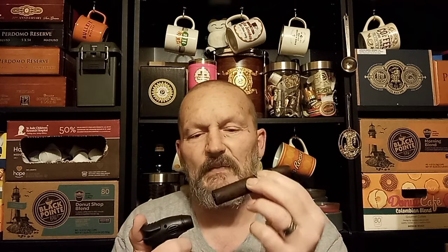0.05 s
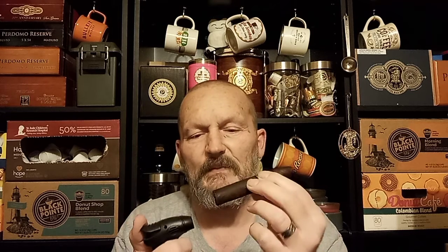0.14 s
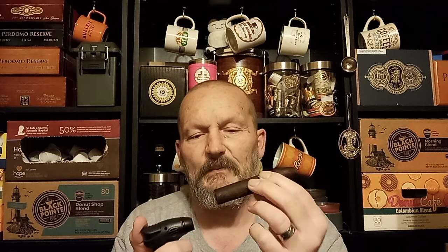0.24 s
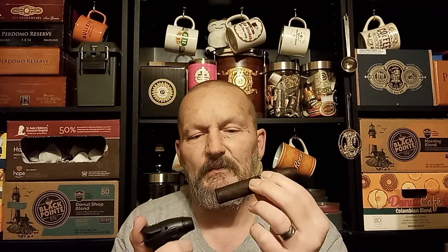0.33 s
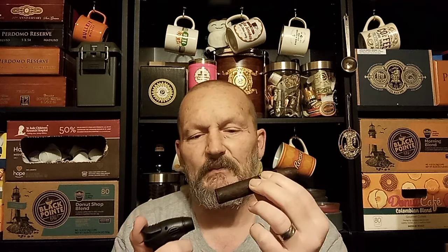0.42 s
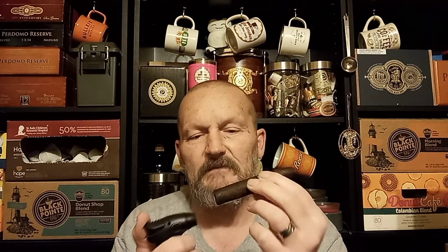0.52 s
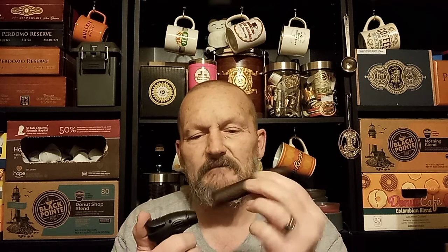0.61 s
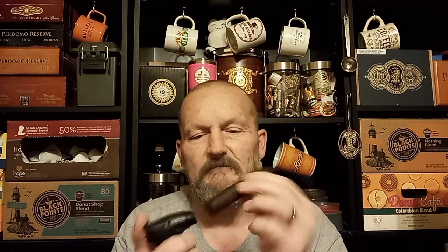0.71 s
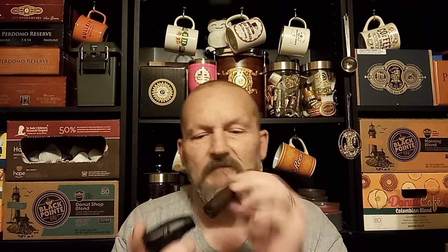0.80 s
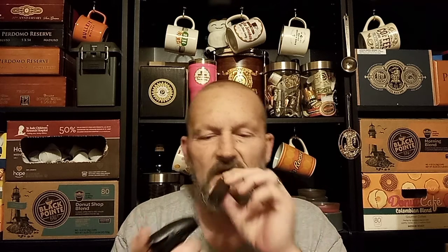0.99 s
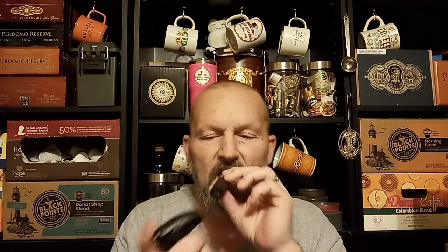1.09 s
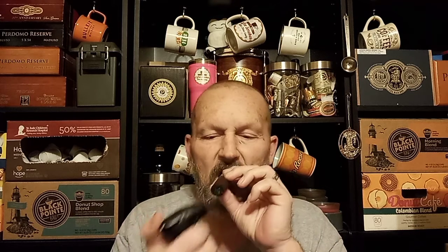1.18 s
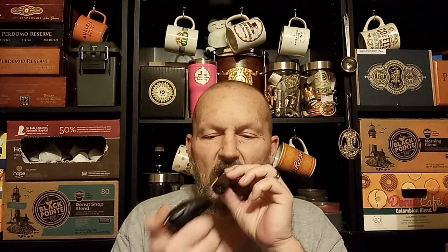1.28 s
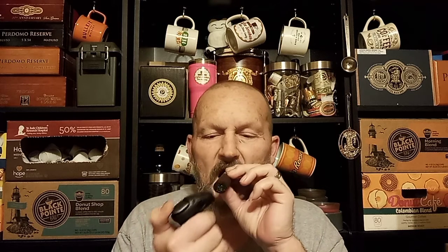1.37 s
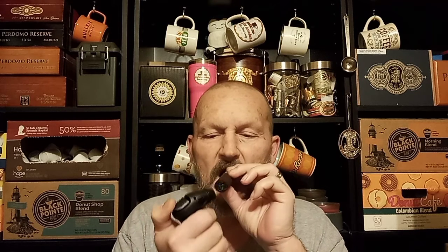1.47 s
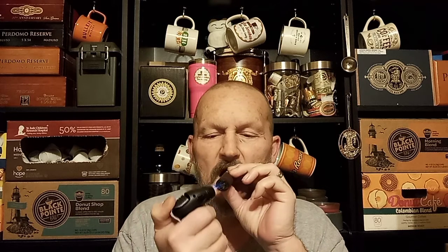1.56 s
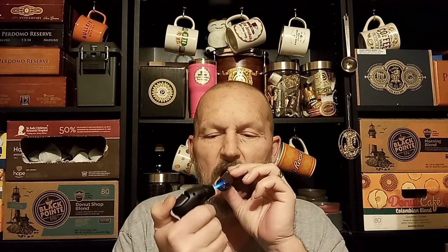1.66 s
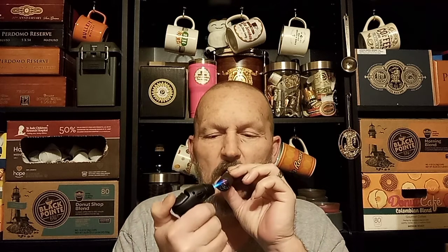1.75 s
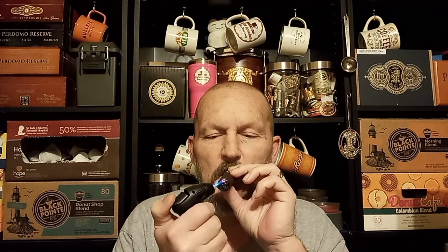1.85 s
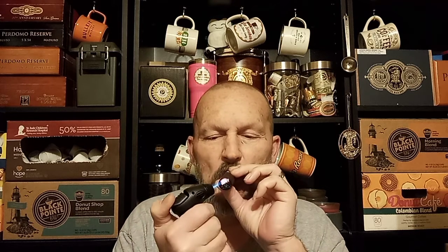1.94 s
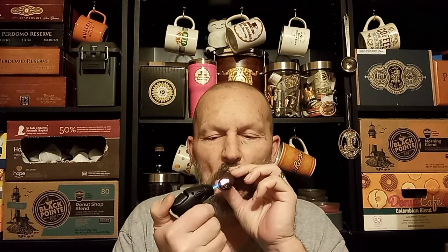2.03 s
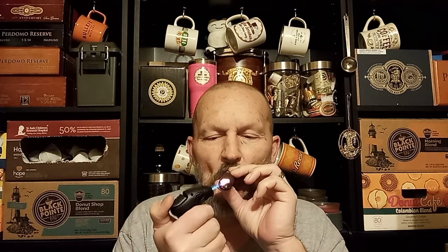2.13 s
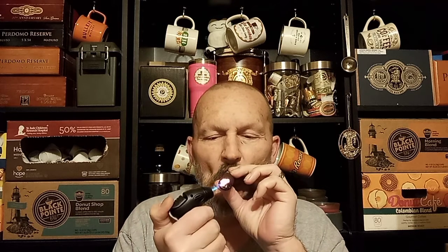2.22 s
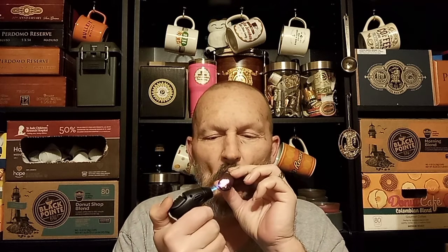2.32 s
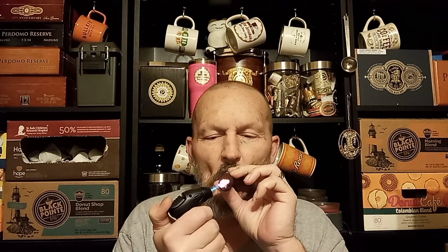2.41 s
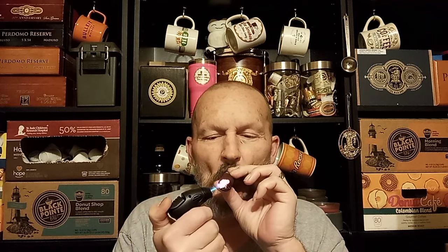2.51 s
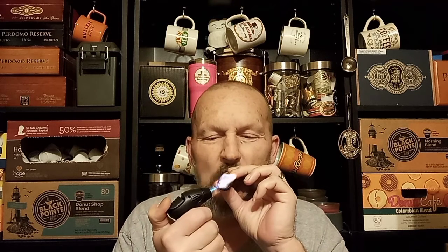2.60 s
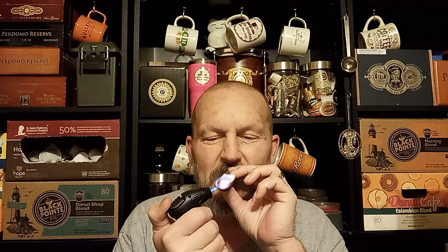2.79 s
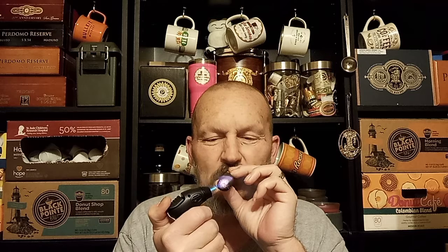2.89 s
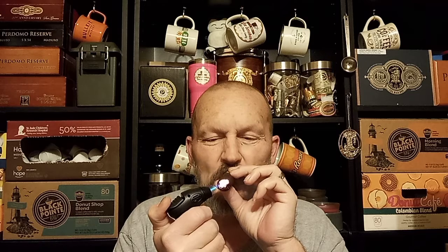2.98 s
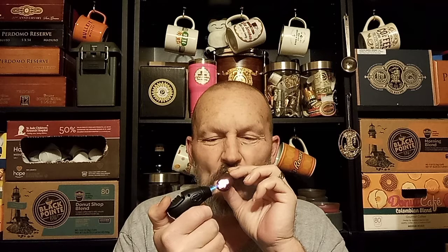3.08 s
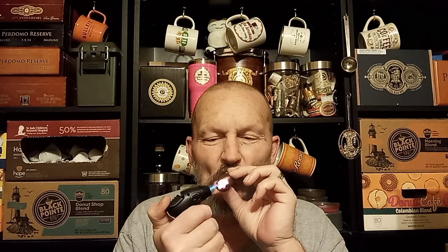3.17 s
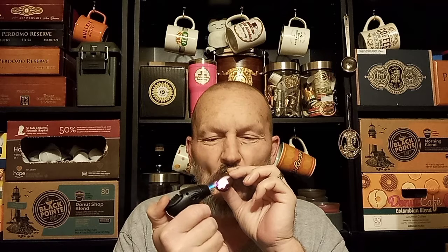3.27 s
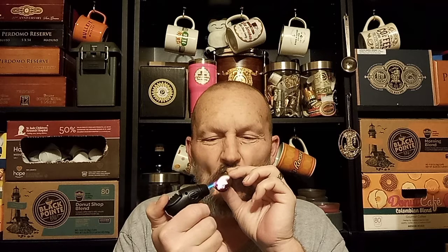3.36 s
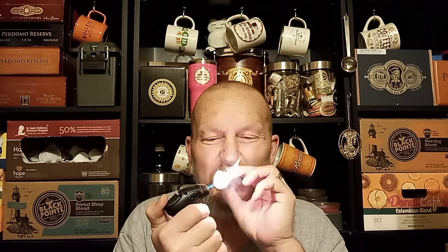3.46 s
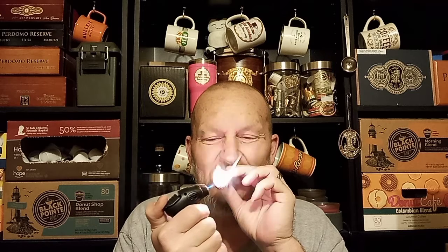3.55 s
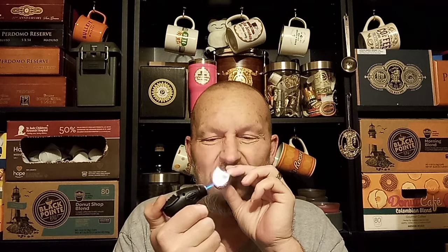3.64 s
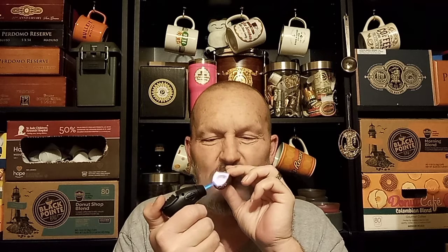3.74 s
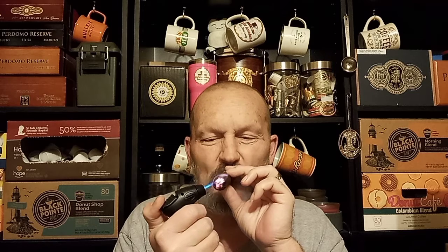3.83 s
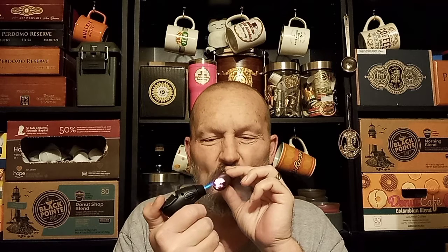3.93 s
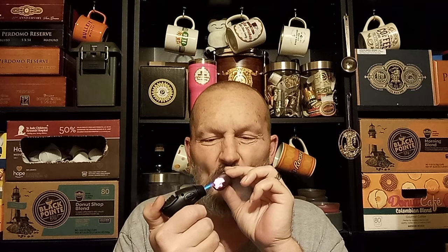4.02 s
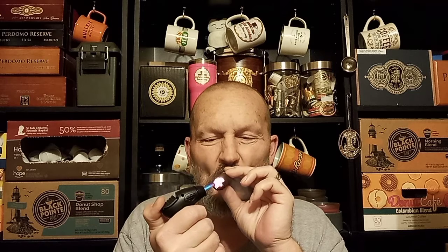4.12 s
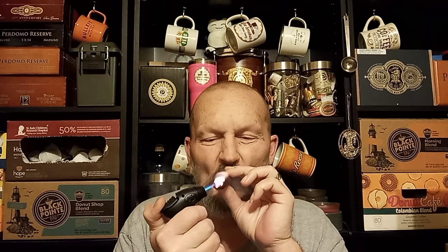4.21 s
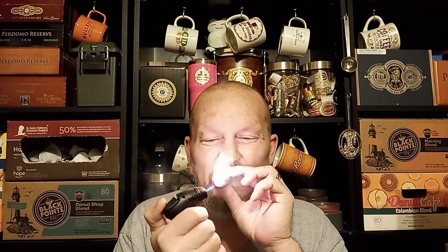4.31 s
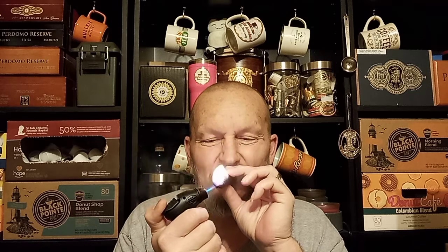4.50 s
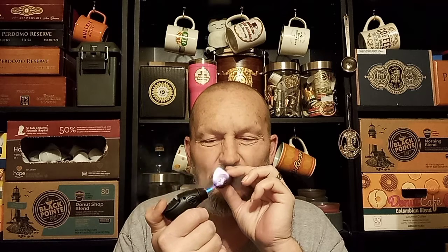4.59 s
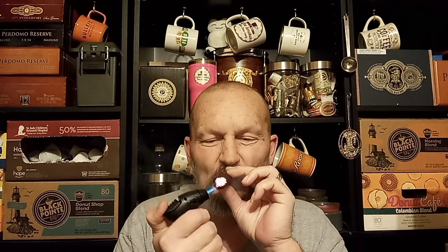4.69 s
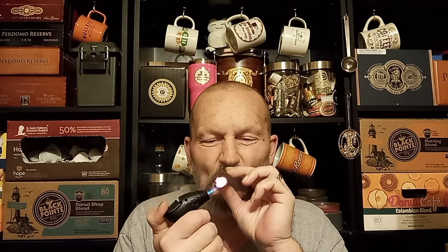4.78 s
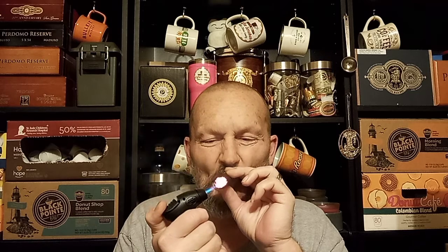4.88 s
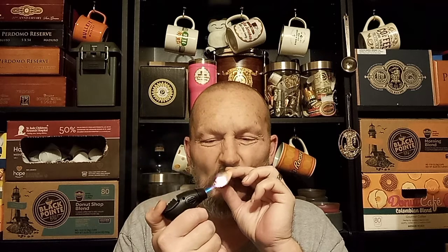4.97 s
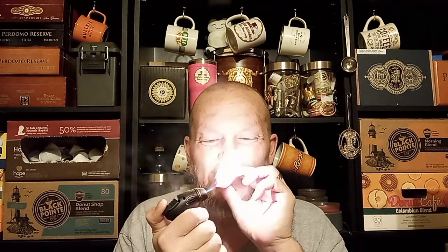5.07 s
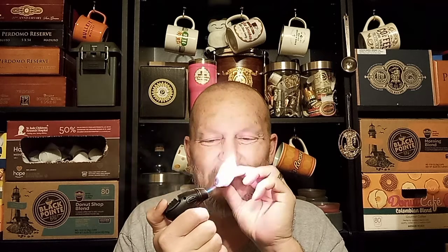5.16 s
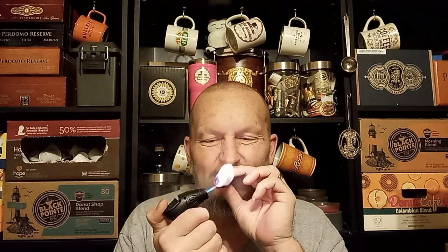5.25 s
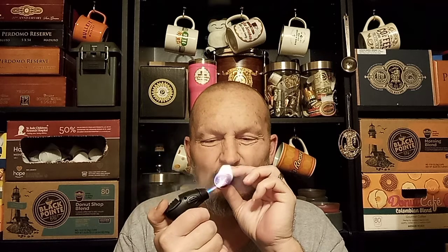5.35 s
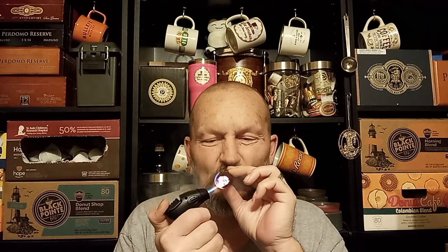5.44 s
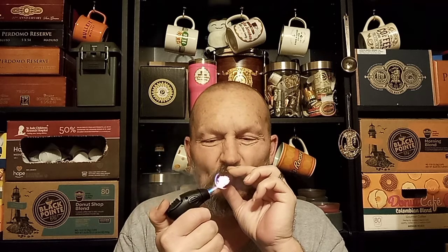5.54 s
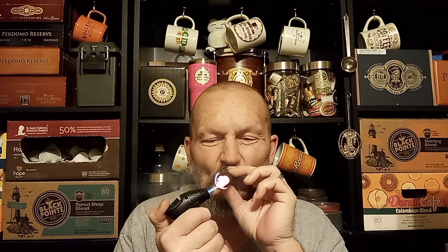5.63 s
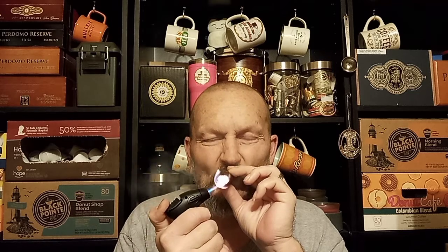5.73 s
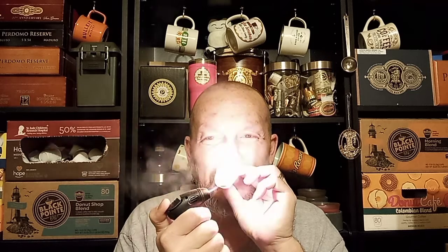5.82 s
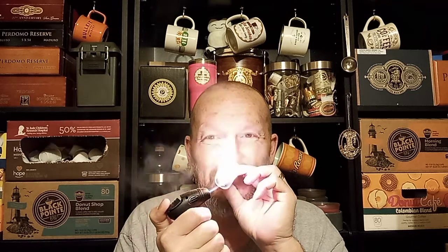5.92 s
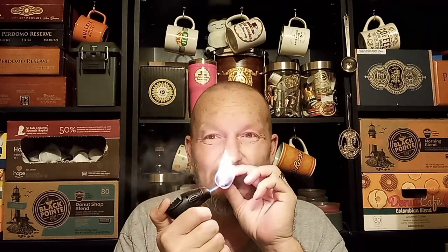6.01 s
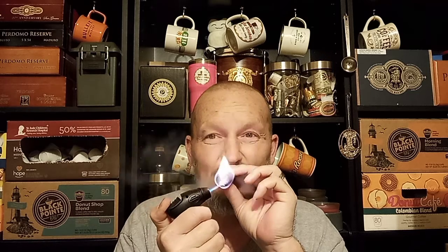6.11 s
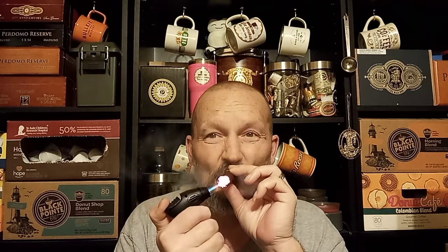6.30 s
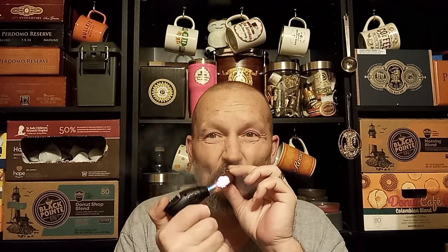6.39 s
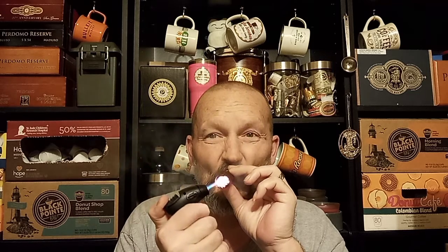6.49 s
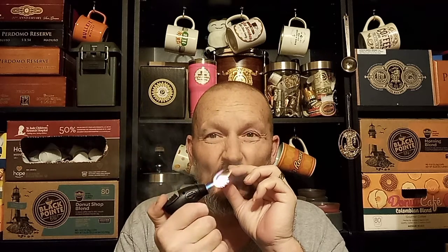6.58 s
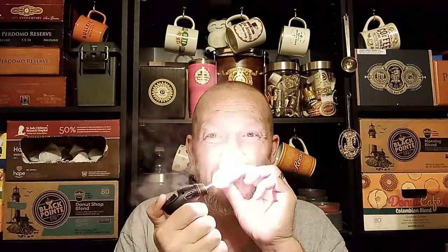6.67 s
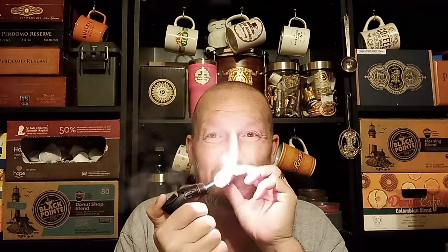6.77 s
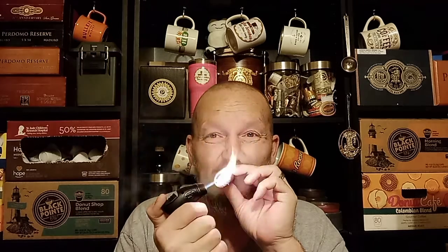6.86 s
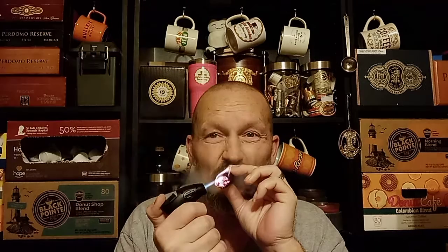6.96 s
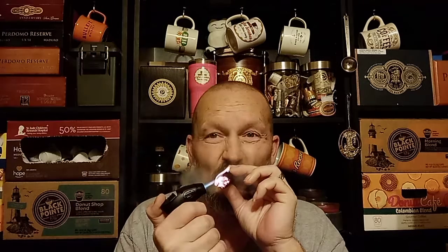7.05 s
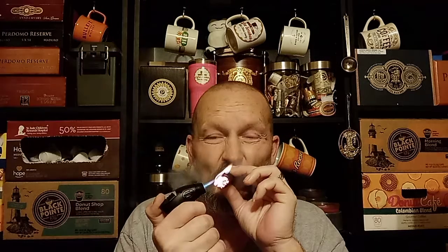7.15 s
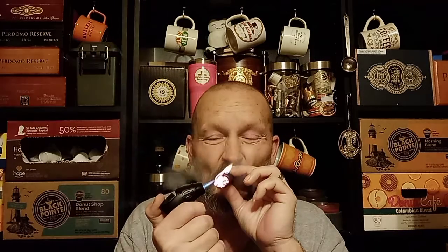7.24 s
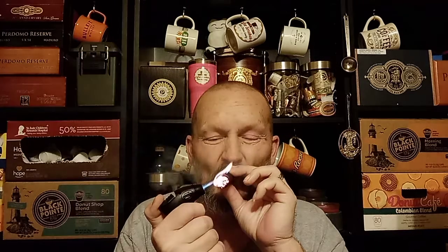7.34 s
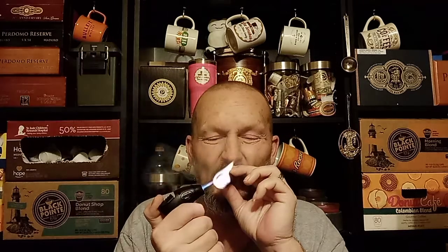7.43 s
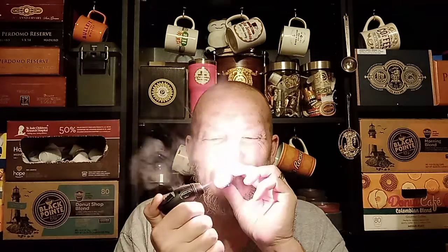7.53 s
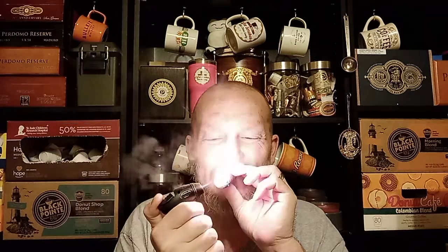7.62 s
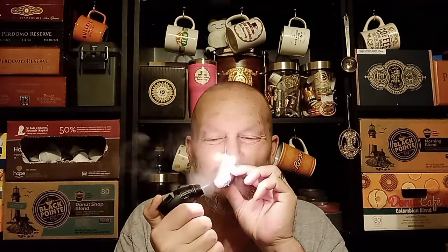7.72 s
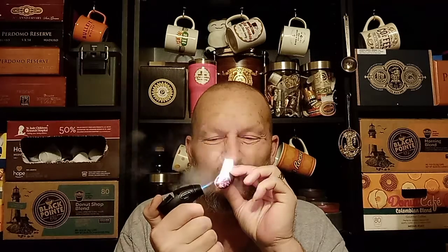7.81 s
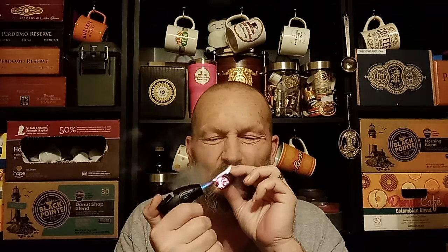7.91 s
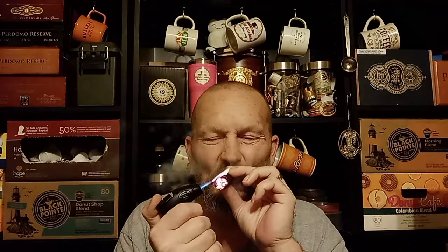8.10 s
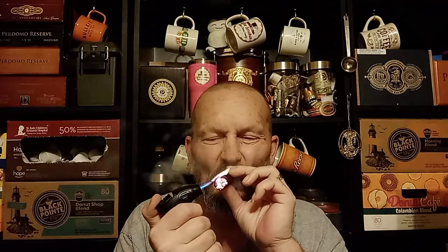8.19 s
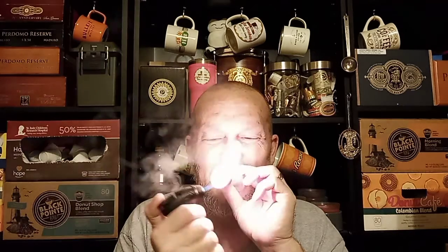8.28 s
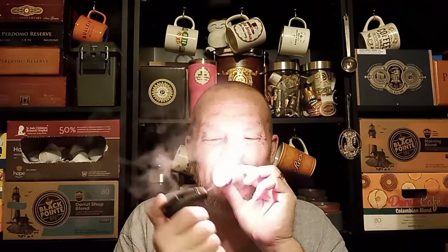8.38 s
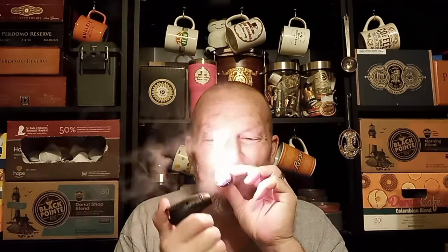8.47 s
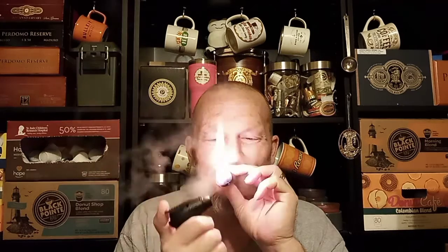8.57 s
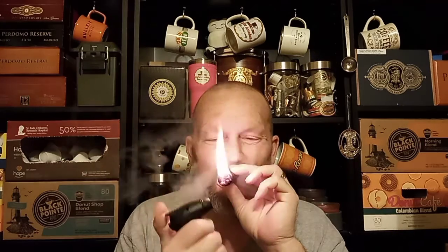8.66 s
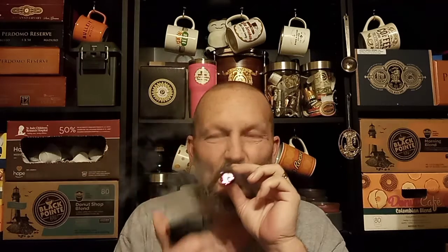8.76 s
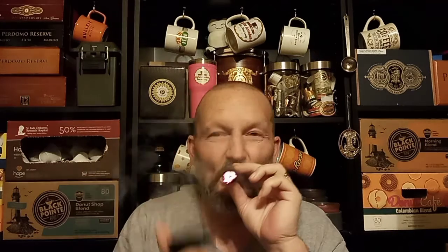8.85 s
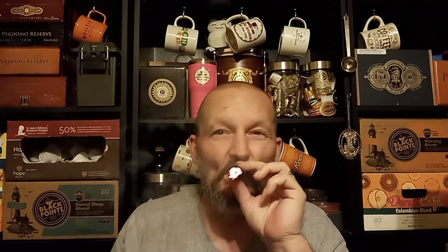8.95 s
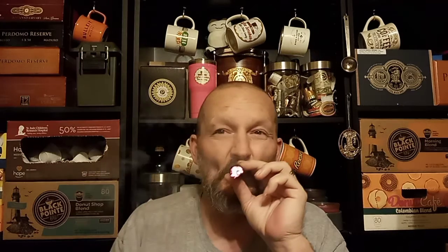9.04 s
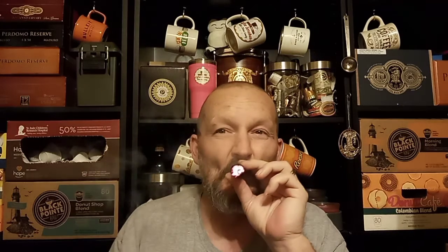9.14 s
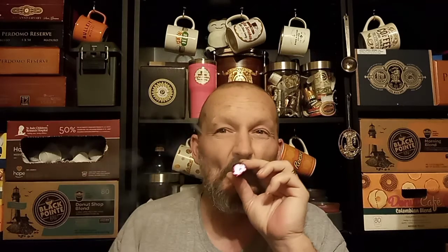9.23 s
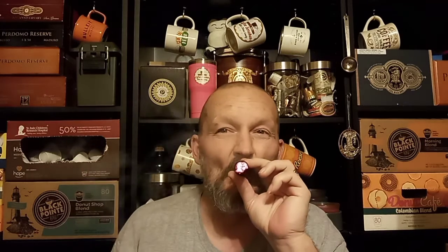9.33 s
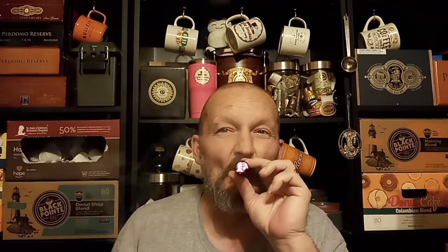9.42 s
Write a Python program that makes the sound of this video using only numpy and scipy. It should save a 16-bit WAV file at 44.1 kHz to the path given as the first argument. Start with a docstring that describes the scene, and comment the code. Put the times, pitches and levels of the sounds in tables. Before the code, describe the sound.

A quiet small room, heard by a close single microphone: a low, airy fan hum and fine, irregular metallic ticks from a tiny motor, about 25 possible beats per second with gaps, lasting almost to the end. At 0.1 s there is a handling knock with a brief rustle. Around 1.2 s gas starts hissing faintly, and at 1.46 s a very sharp igniter snap rings metal and briefly ducks everything. A torch jet follows, bright hiss over softer turbulent roar, growing by 2.2 s with a brief airy whistle, easing near 3.2 s, fuller from 3.5 to 5 s, weaker around 5.4 and 6.4 to 6.8 s, strongest near 7.9 s. Tiny dry pops occur at 2.5, 2.8, 4.1, 5.6, 6.5, 7.3 and 8.1 s. The flame fades by 8.3 s, a click lands at 8.4 s, and remaining gas stops by 8.5 s. Small taps and knocks follow at 9.1 to 9.3 s over the fan.

```python
"""A butane torch lighter: gas hisses from the nozzle, the flame roars on a cigar, then the valve shuts.
The jet is shaped noise following the gas flow; the igniter snap is a crack plus ringing metal.
Handling knocks and rustles, and pops of burning leaf, are short filtered clicks and noise.
A camera lens motor ticks beside the microphone as rows of tiny ringing strokes; a fan hums behind.
The small room adds early echoes and a tail, and gain control ducks the mix after loud hits."""
import sys
import numpy as np
from scipy import signal
from scipy.fft import rfft, irfft
from scipy.io import wavfile
from scipy.ndimage import uniform_filter1d

SR = 44100
rng = np.random.default_rng(int(sys.argv[2]) if len(sys.argv) > 2 else 0)


def nominal_scale(level):
    """Amplitude ratio for a level in decibels (scalar or array-like)."""
    x = np.asarray(level, float) / 20
    return 10 ** x


def generate_wav(sig):
    """Save sig (samples, or channels by samples) to the path in sys.argv[1] as 16-bit PCM at SR."""
    pcm = np.round(np.clip(np.atleast_2d(sig).T, -1, 1) * 32767).astype(np.int16)
    wavfile.write(sys.argv[1], SR, pcm)


N = 418950  # samples

# nozzle hiss as the hand turns the jet: (t/s, relative level/dB)
FLOW = [(1.3, -72), (1.6, -62), (1.93, -61), (2.2, -57.5), (2.67, -57.5), (3.17, -60.5), (3.49, -56),
        (4.09, -55), (5.02, -56), (5.42, -61), (6.1, -57.5), (6.38, -62), (6.8, -64), (7.85, -53),
        (8.31, -59.5), (8.45, -54)]
# flame lit: (on/s, off/s)
LIT = (1.47, 8.29)
# gas valve: (open/s, shut/s)
GAS = (1.155, 8.54)


def evened(x):
    """Scales to rms 1."""
    return x / np.sqrt(np.mean(x ** 2) + 1e-20)


def read(points, hz):
    """Reads a table over log frequency."""
    f, value = np.transpose(points)
    return np.interp(np.log(hz + 1), np.log(f + 1), value)


def noise(tone, patchy_db, flicker_db, drift_db=0., size=1024, until_s=None):
    """Noise at rms 1 from random spectra, with small patches, slow drifts of colour and a shared flicker."""
    n = round(until_s * SR) if until_s else N
    frames = 4 * n // size + 5
    hz = np.fft.rfftfreq(size, 1 / SR)
    real, imag, grain = rng.standard_normal((frames, len(hz), 3)).T
    drift = uniform_filter1d(uniform_filter1d(grain, size=24, axis=0), size=90, axis=1)
    drift = evened(drift)[::-1]  # flipped in frequency, away from the patches of the same grain
    patches = evened(uniform_filter1d(uniform_filter1d(grain, size=10, axis=0), size=16, axis=1))
    flicker = evened(uniform_filter1d(rng.standard_normal(frames), size=6))
    level_db = read(tone, hz)[:, None] + patchy_db * patches + drift_db * drift + flicker_db * flicker
    spectra = (real + 1j * imag) * nominal_scale(level_db)
    sound = signal.istft(spectra, nperseg=size, noverlap=3 * size // 4)[1][:n]
    return np.pad(evened(sound), (0, N - n))


def swell(s, db, on, off, fade_s):
    """Gain from a level curve, open between on and off."""
    t = np.arange(N) / SR
    return nominal_scale(np.interp(t, s, db)) * np.clip(np.minimum(t - on, off - t) / fade_s, 0, 1)


def ring(modes, rise_s):
    """Resonances struck together: dying sines of alternate sign after a soft start, peak 1."""
    t = np.arange(SR // 5) / SR
    y = np.zeros(len(t))
    for k, (hz, db, t60) in enumerate(modes):
        y += (-1) ** k * nominal_scale(db - 60 * t / max(t60, .001)) * np.sin(2 * np.pi * hz * t)
    y = y * (1 - np.exp(-(t / rise_s) ** 2))
    return y / abs(y).max()


def click(tone):
    """One sharp minimum-phase click: coloured without any sound ahead of it, peak 1."""
    log_gain = np.log(nominal_scale(read(tone, abs(np.fft.fftfreq(2048, 1 / SR)))))
    y = np.fft.ifft(np.exp(np.conj(signal.hilbert(log_gain)))).real[:1024]
    return y / abs(y).max()


def blow(s, crack_db, tone, after, knock_hz, knock_db, t60):
    """A sharp crack with a millisecond of splinters, what sounds after it, and a low ringing knock."""
    out = np.zeros(N + SR)
    t = np.arange(len(after)) / SR
    spark = 0.18 * rng.standard_normal(len(t)) * np.exp(-abs(t - .0013) / 0.00076)
    spark[66] = 1.0  # the main crack among the splinters
    crack = signal.oaconvolve(spark, click(tone))[:len(t)]
    crack = nominal_scale(crack_db) * crack / abs(crack).max()
    modes = [(knock_hz, 0, t60), (1.41 * knock_hz, -7, 0.11 * t60), (0.9 * knock_hz, -9, 0.39 * t60)]
    knock = nominal_scale(knock_db) * ring(modes, 0.26 / knock_hz)
    start = round(s * SR) - 40  # the splinters lead in
    out[start:][:len(t)] = crack + after + knock
    return out[:N]


def echoed(x, share=1.):
    """Adds the first few reflections as delayed, signed copies."""
    # table top, hands and shelves: (delay/s, signed gain)
    reflections = [(.00122, 0.082), (.00217, 0.15), (.0025, 0.27), (.0028, -0.15), (.00335, 0.38),
                   (.0045, -0.0034), (.00485, -0.085), (.007, 0.23)]
    return x + share * sum(gain * np.roll(x, round(s * SR)) for s, gain in reflections)


def room(x, slow=0.96):
    """Room tail alone: sparse taps of random sign, each band dying at its own speed; slow scales the t60."""
    # decay of the room: (f/Hz, unscaled t60/s)
    decay = [(800, 0.0056), (2110, 0.16), (5570, 0.16), (14700, 0.12)]
    taps = np.zeros(SR // 3)
    at = np.arange(200, len(taps) - 20, 20)
    taps[at + rng.integers(0, 20, len(at))] = rng.choice([-1., 1.], len(at))
    hz, t, z = signal.stft(taps, SR, nperseg=128)
    dying = nominal_scale(-60 * t / (slow * read(decay, hz)[:, None]))
    tail = signal.istft(z * dying, SR, nperseg=128)[1]
    return signal.oaconvolve(x, tail / np.linalg.norm(tail))[:N]


def fan():
    """Fan behind: air noise, lifted at the resonances of the casing."""
    # colour of the air noise: (f/Hz, relative level/dB)
    air_tone = [(18, -55), (45, -23), (85, -16.5), (240, -7), (310, -6), (394, -13.5), (800, -12),
                (1300, -12.5), (1500, -19.5), (2300, -15.5), (2800, -32), (4200, -30.5), (6500, -17),
                (8200, -42.5), (15800, -47), (16000, -85)]
    # resonances of the casing: (f/Hz, width/Hz, lift/dB)
    casing = [(478.7, 92, 15), (594, 18, 11), (681.6, 62, 9.5), (937, 48, 6)]
    level_db = -59.5  # rms
    air = rfft(noise(air_tone, patchy_db=2.0, flicker_db=1.24, size=2048))
    hz = np.fft.rfftfreq(N, 1 / SR)
    lift_db = sum(db / (1 + (2 * (hz - f) / width) ** 2) for f, width, db in casing)
    return nominal_scale(level_db) * evened(irfft(air * nominal_scale(lift_db), N))


def lens():
    """Lens motor on a steady clock: each step is a brief buzz that sets three parts ringing."""
    # steps of the motor: (beat, kind of stroke)
    steps = [(0, 2), (1, 2), (4, 4), (7, 2), (10, 5), (12, 4), (14, 6), (16, 4), (17, 4), (18, 4), (20, 1),
             (21, 5), (24, 6), (25, 6), (27, 2), (30, 3), (33, 1), (34, 1), (41, 5), (43, 3), (46, 0),
             (48, 2), (50, 0), (51, 1), (55, 4), (58, 1), (60, 4), (61, 3), (62, 4), (64, 6), (65, 5),
             (66, 4), (67, 4), (68, 3), (69, 1), (72, 0), (73, 6), (74, 5), (75, 2), (79, 4), (81, 1),
             (82, 5), (85, 3), (88, 5), (89, 1), (94, 5), (95, 1), (99, 3), (105, 3), (106, 6), (107, 1),
             (109, 1), (110, 1), (112, 3), (113, 6), (116, 1), (119, 5), (120, 2), (121, 0), (122, 1),
             (123, 0), (124, 5), (125, 4), (126, 5), (127, 6), (132, 5), (134, 2), (136, 6), (137, 5),
             (140, 4), (141, 5), (143, 6), (144, 4), (147, 3), (150, 3), (151, 4), (153, 1), (155, 2),
             (157, 4), (158, 1), (159, 6), (163, 6), (164, 1), (166, 0), (168, 6), (169, 0), (170, 5),
             (172, 6), (174, 5), (175, 4), (176, 5), (177, 2), (179, 6), (184, 3), (187, 5), (188, 6),
             (189, 1), (191, 3), (192, 1), (195, 5), (197, 0), (198, 4), (199, 1), (201, 4), (202, 2),
             (208, 2), (211, 4), (212, 5), (215, 3), (216, 2), (218, 1), (220, 0), (221, 5), (223, 6),
             (224, 5), (225, 4), (226, 3), (227, 4), (228, 0), (230, 0), (232, 2), (233, 0), (235, 3),
             (236, 5), (237, 2), (239, 2)]
    # strokes 0-6, nudge to rattly, whistly, plain: relative (body level/dB, barrel level/dB, drive level/dB)
    strokes = [(-46.5, -68, -64), (-44.5, -53.5, -50.5), (-42.5, -55, -44.5), (-41.5, -60, -47),
               (-40.5, -61, -51.5), (-41.5, -60.5, -59), (-42, -59, -63)]
    # ringing of body, barrel and drive, one list each: (f/Hz, relative level/dB, t60/s)
    parts = [
        [(3370, -17, 0.0071), (3730, -25.5, 0.011), (5367, -0.5, 0.0059), (5560, -1, 0.012), (5960, -3, 0.0069),
         (6530, -2.5, 0.0085), (6740, -5.5, 0.0088), (7190, -8, 0.0082), (8150, -12, 0.0036)],
        [(8700, -11, 0.0052), (10100, -4.5, .008), (10370, -5, 0.013), (10800, -5, 0.017), (11260, 0.5, 0.0058),
         (12150, -20, .006)],
        [(13530, -25, .005), (14230, -4, 0.0076), (14350, -2.5, 0.01), (15250, -1, 0.012), (15470, -1, 0.0081),
         (14900, -9, .006)],
    ]
    # the clock wanders: (beat, lateness/s)
    wander = [(0, 0), (38, -.0016), (95, -.0001), (125, -.0001), (157, .0004), (195, -.0003), (235, .0004)]
    beat_s, first_s, spread_db = .039245, .0342, 0.94
    beat, stroke = np.transpose(steps)
    s = first_s + beat_s * beat + np.interp(beat, *np.transpose(wander))
    parts_db = np.array(strokes)[stroke] + spread_db * rng.standard_normal((len(s), 3))
    t = np.arange(160) / SR
    buzz = 0.31 * rng.standard_normal((len(s), len(t))) * np.exp(-((t - .0012) / 0.0011) ** 2)
    direction = rng.choice([-1, 1], (len(s), 1))  # forward or back
    buzz[:, [30, 75]] += direction * np.array([1.6, .9])  # the catch and the stop
    out = np.zeros((2, N + SR))  # even and odd steps get room tails of their own
    for modes, part_db in zip(parts, parts_db.T):
        ticks = signal.fftconvolve(buzz, ring(modes, 0.00008)[None, :SR // 20], axes=1)
        onset_rms = np.sqrt((ticks[:, :200] ** 2).mean(1) * 2)
        ticks *= (nominal_scale(part_db - 5.0) / onset_rms)[:, None]
        for k, (at, tick) in enumerate(zip(np.round(s * SR).astype(int), ticks)):
            out[k % 2, at:at + len(tick)] += tick
    return sum(half[:N] + nominal_scale(-8.0) * room(half[:N], slow=0.58) for half in out)


def pops():
    """Burning leaf: single sharp clicks, each thrown back by the room."""
    # (t/s, level/dB)
    moments = [(2.496, -35), (2.7575, -36), (4.075, -35), (5.6259, -31.5), (5.652, -31), (6.4618, -31),
               (7.294, -34), (8.1275, -28)]
    # colour of a pop: (f/Hz, relative level/dB)
    pop_tone = [(400, -33), (1200, -15.5), (2500, -13.5), (4500, -16), (6700, -4.5), (7800, -24),
                (9000, -29), (15000, -35), (16500, -73)]
    s, db = np.transpose(moments)
    train = np.zeros(N)
    train[np.round(s * SR).astype(int)] = nominal_scale(db)
    out = signal.oaconvolve(train, click(pop_tone))[:N]
    return echoed(out) + nominal_scale(-3) * room(out)


def igniter():
    """Igniter snap: a crack that rings the metal shell, with a knock below."""
    # (crack level/dB, shell level/dB, knock f/Hz, knock level/dB, knock t60/s)
    snap = (-8, -25.5, 1481, -33, 0.03)
    # colour of the crack: (f/Hz, relative level/dB)
    crack_tone = [(350, -50), (600, -46), (1270, -49), (1500, -22), (3170, -24), (3900, -10.5),
                  (4940, -17.5), (6800, 4), (8600, -21), (11200, -16.5), (13600, -21), (15200, -21),
                  (15800, -14), (16500, -33)]
    # metal of the lighter: (f/Hz, relative level/dB, t60/s)
    shell = [(3800, -8, 0.029), (3900, -26, 0.05), (4040, -12, 0.0384), (5760, -30, 0.054),
             (6500, -16, .06)]
    snap_s = 1.4565
    crack_db, shell_db, *knock = snap
    return blow(snap_s, crack_db, crack_tone, nominal_scale(shell_db) * ring(shell, .0006), *knock)


def handling():
    """Hands on lighter and table: clicks and knocks trailing a dying rustle of noise."""
    # (t/s, click level/dB, rustle level/dB, knock f/Hz, knock level/dB, knock t60/s)
    knocks = [(.084, -32, -51.5, 192, -36, 0.1), (1.4577, -57, -75, 150, -40, 0.038),
              (8.3977, -30.5, -60, 1505, -34.5, 0.023), (9.091, -38.5, -83, 6700, -44, 0.012),
              (9.2443, -35.5, -65, 707, -37, .04), (9.262, -60, -92, 147, -47.5, 0.067),
              (9.275, -60, -88, 335, -52.5, 0.11), (9.295, -62, -92, 258, -51, 0.071)]
    # colour of the click: (f/Hz, relative level/dB)
    click_tone = [(1500, -22), (3000, -19.5), (5000, -8), (6700, 2.5), (7600, -10), (8600, -33),
                  (15200, -21), (16200, -34.5)]
    # colour of the rustle: (f/Hz, relative level/dB)
    rustle_tone = [(800, -6), (2500, -12), (4500, -7.5), (6700, 0.5), (8300, -13), (12500, -14),
                   (15200, -5), (16200, -33)]
    rustle_t60_s = .43
    t = np.arange(SR // 5) / SR
    cloth = noise(rustle_tone, patchy_db=5.5, flicker_db=1.5, size=256)
    fades = np.minimum(t / 0.0018, 1) * np.clip((t[-1] - t) / 0.0092, 0, 1)
    out = np.zeros(N)
    for s, click_db, rustle_db, *knock in knocks:
        rustle = nominal_scale(rustle_db - 60 * t / rustle_t60_s) * fades * cloth[round(s * SR):][:len(t)]
        out += blow(s, click_db, click_tone, rustle, *knock)
    return out


def hits():
    """Snap and handling in the room, which answers the snap more strongly."""
    snap, knocks = igniter(), handling()
    return echoed(snap + knocks) + room(nominal_scale(6.5) * snap + nominal_scale(-4) * knocks)


def whistle():
    """A brief airy whistle: noise in a narrow band with two humps, sinking 6 dB."""
    # (from/s, to/s, centre f/Hz, half width/Hz, relative level/dB)
    airy = (2.228, 2.31, 4450, 300, -55)
    on, off, hz, width, db = airy
    tone = [(hz - 2 * width, -50), (hz - width, 0), (hz, -5), (hz + width, 0), (hz + 2 * width, -50)]
    breath = noise(tone, patchy_db=3.0, flicker_db=0.5, until_s=off)
    return swell([on, off], [db, db - 6], on, off, .01) * breath


def fizz():
    """Fine treble noise: one colour for unlit gas, another for the burning jet."""
    # fizz of unlit gas: (f/Hz, relative level/dB)
    cold_tone = [(4410, -17.5), (7500, 1.5), (8920, -26), (10400, -10), (13200, -28), (14000, -31),
                 (15100, -11), (15800, -9), (15950, -50)]
    # fizz of the burning jet: (f/Hz, relative level/dB)
    lit_tone = [(7500, -34), (9300, -50), (10500, -17), (12000, -12.5), (14200, -11), (15200, 8),
                (15800, -9), (15950, -65)]
    cold_db, lit_db = -62.5, -66  # relative levels
    cold = noise(cold_tone, patchy_db=4.5, flicker_db=1.5, until_s=LIT[0] + .1)
    cold = swell(LIT, [cold_db] * 2, GAS[0], LIT[0], 0.018) * cold
    lit = swell(LIT, [lit_db] * 2, *LIT, 0.068) * noise(lit_tone, patchy_db=3.5, flicker_db=2.5)
    return cold + lit


def hiss():
    """Raw gas through the nozzle: noise that follows the flow while the valve is open."""
    # colour of the hiss: (f/Hz, relative level/dB)
    hiss_tone = [(2500, -44.5), (4500, -15), (5600, -14), (6700, 0), (7400, -14.5), (8300, -39.5),
                 (9300, -44), (10300, -36), (12000, -52)]
    opening = swell(*np.transpose(FLOW), GAS[0], 9.5, 0.02)
    shutting = swell(GAS, [0, 0], 0, GAS[1], 0.11)  # the valve closes more slowly than it opens
    return opening * shutting * noise(hiss_tone, patchy_db=2.5, flicker_db=0.45)


def roar():
    """Turbulent flame: lower noise whose level follows the gas flow in part."""
    # colour of the roar: (f/Hz, relative level/dB)
    roar_tone = [(300, -27), (800, -4.5), (1250, -6.5), (1600, -0.5), (2400, -2), (2750, -8), (3300, -2.5),
                 (3800, -10), (4400, -9), (6000, -12.5), (8000, -37), (9000, -47)]
    usual_db, usual_hiss_db, follows = -58.5, -57.5, 0.52  # relative levels; share of each dB of flow
    s, hiss_db = np.transpose(FLOW)
    level_db = usual_db + follows * (hiss_db - usual_hiss_db)
    return swell(s, level_db, *LIT, 0.048) * noise(roar_tone, patchy_db=1.5, flicker_db=0.95, drift_db=0.2)


def torch():
    """The whole jet, gas and flame, with softened echoes and a room tail."""
    jet = hiss() + fizz() + roar() + whistle()
    return nominal_scale(-0.12) * echoed(jet, share=0.69) + nominal_scale(-7.5) * room(jet)


def scene():
    """Mixes fan, lens, pops, hits and torch to one channel."""
    high_pass = signal.butter(2, 80, "high", fs=SR, output="sos")
    near = signal.sosfilt(high_pass, hits() + pops())  # small things push little bass
    return (torch() + near + lens() + fan())[None]


def top_cut(x):
    """Nothing passes above the cut-off."""
    return signal.sosfilt(signal.butter(12, 17070, fs=SR, output="sos"), x)


def record(dry):
    """Microphone treble edge, and gain control that ducks just after loud peaks and recovers steadily."""
    mic_edge_hz, threshold_db, release_db_per_s = 16700, -35.0, 240.0  # release of the tracked peak
    power_db = 10 * np.log10(abs(uniform_filter1d(dry[0] ** 2, size=200)) + 1e-12)
    fall = np.arange(N) * release_db_per_s / SR
    peak_db = np.maximum.accumulate(power_db + fall) - fall
    over_db = np.maximum(peak_db - threshold_db, 0)
    late_db = np.roll(uniform_filter1d(over_db, size=200), 200)  # reacts some 5 ms late
    low_pass = signal.firwin(255, mic_edge_hz, window=("kaiser", 9), fs=SR)
    mix = signal.oaconvolve(dry, low_pass[None], "same")
    return top_cut(mix * nominal_scale(-.6 * late_db))  # 0.6 dB down for each dB over


dry = scene()
out = record(dry)
generate_wav(out)
```